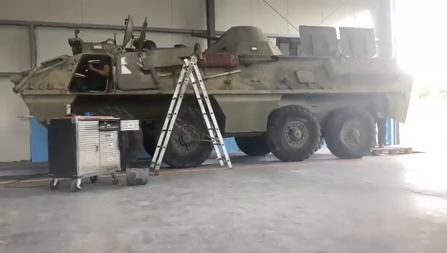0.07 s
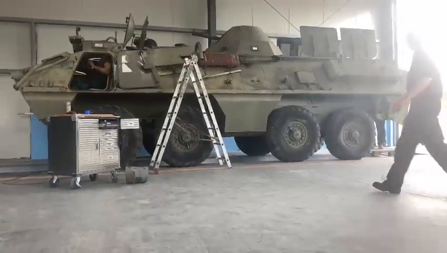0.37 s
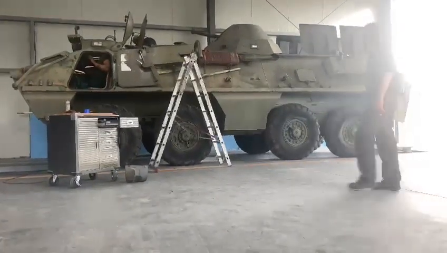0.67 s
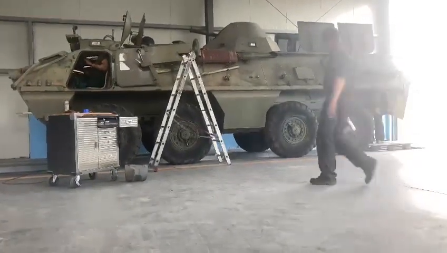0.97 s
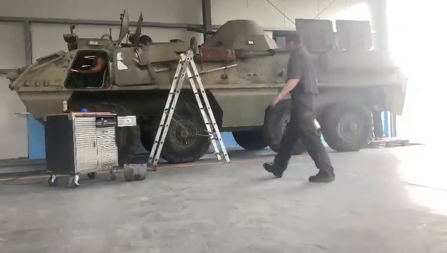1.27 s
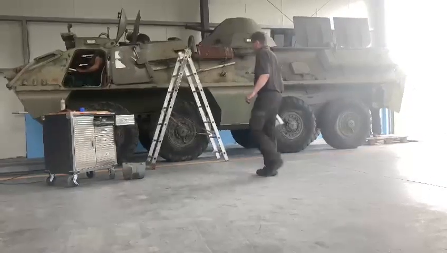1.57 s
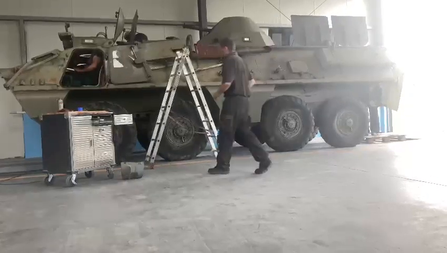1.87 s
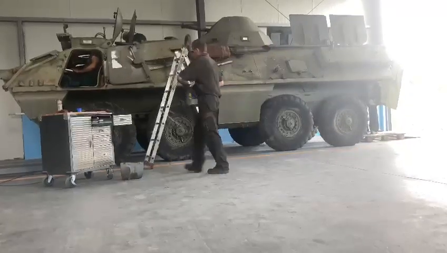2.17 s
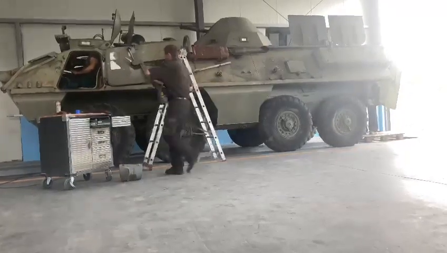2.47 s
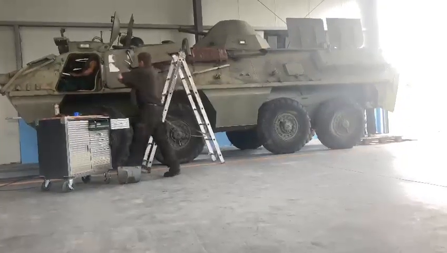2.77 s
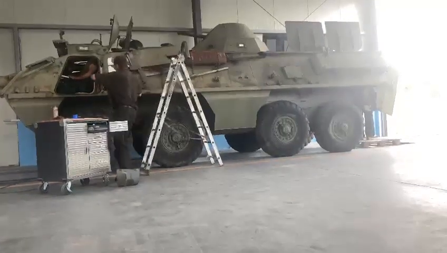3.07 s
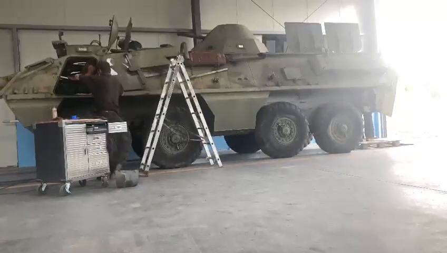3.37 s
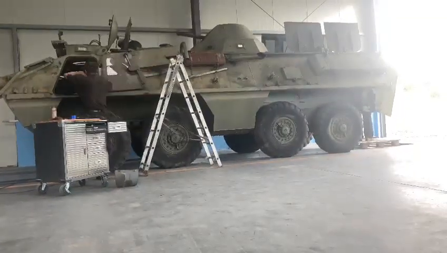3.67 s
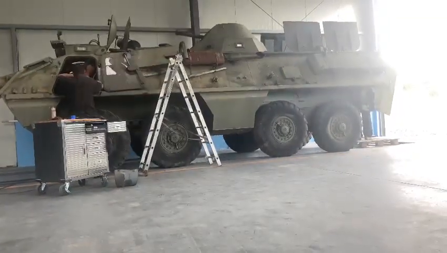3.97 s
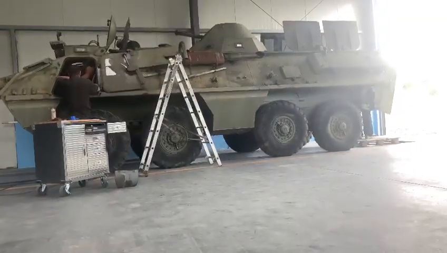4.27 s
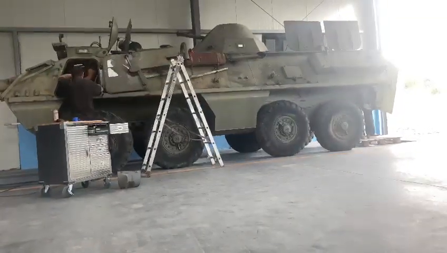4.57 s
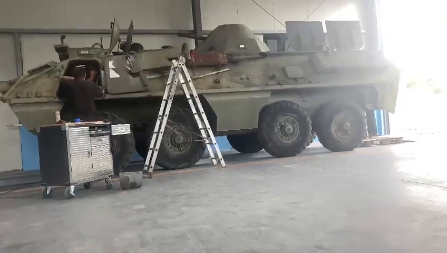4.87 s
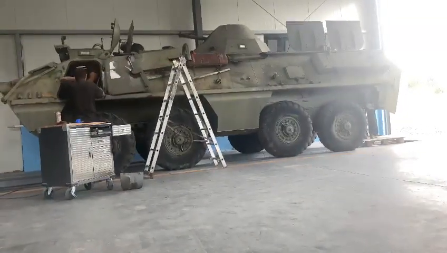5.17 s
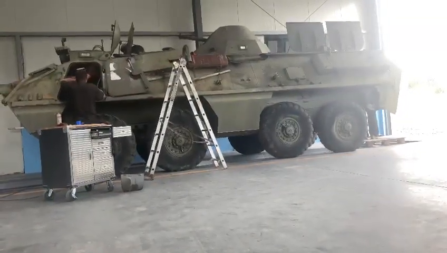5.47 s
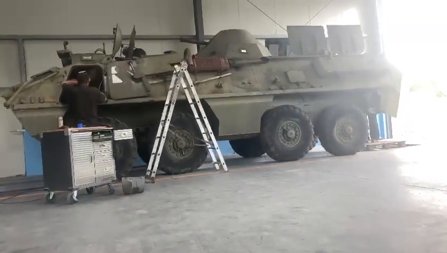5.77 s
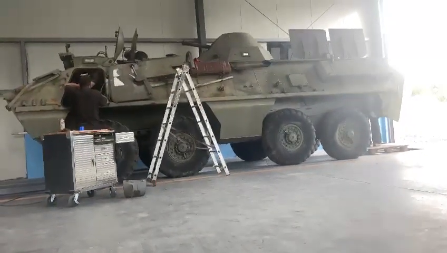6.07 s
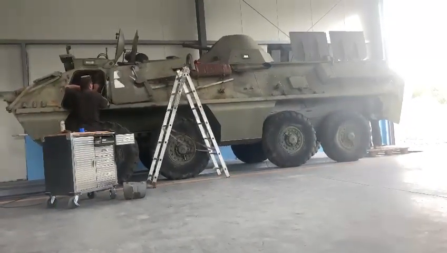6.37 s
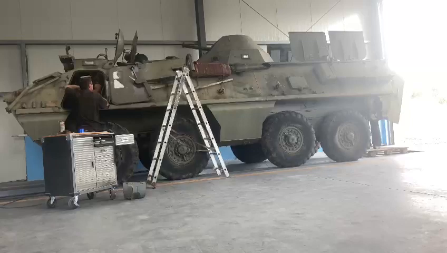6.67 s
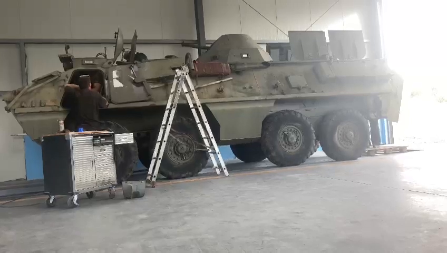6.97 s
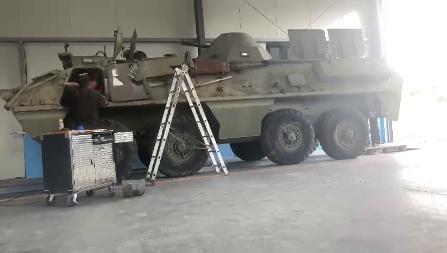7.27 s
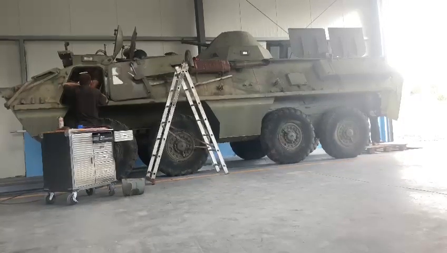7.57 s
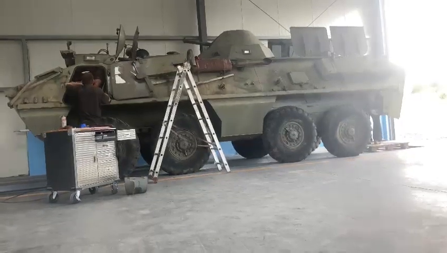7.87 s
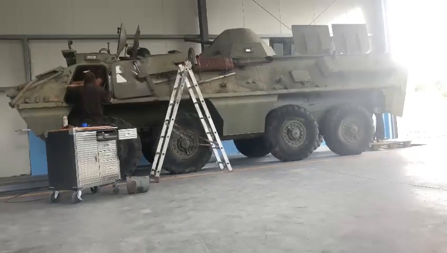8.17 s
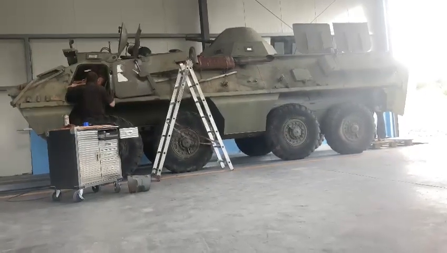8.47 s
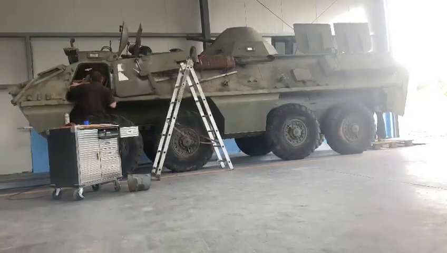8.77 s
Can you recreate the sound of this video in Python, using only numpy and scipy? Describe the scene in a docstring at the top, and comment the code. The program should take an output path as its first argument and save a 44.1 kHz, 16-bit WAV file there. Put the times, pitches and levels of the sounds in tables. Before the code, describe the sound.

A large armoured vehicle engine runs throughout in a big, echoing hangar, heard in stereo from out on the floor. It is revved right at the start and again at about 0.8 seconds, each stab a rough exhaust roar with a low thump and a raspy bark. It then coasts down in deep, booming chugs. More revs come at about 2.6, 3.3 and 4 seconds, climbing higher each time, followed by another high one at 5.3 seconds and a slightly softer last one near 6.9 seconds. A faint whine glides with the engine at the highest speeds. Each roar hangs briefly in the hall. Between revs, fan rush and valve ticking show through the rumble, with a faint metallic ring near idle. From about 7.5 seconds the engine winds down, throbbing more quietly until the end at around 9 seconds.

```python
"""A big, echoing hangar, heard from a stereo pair out on the floor: an eight-cylinder armoured vehicle
is revved seven times. Each stab of throttle opens a rough exhaust roar, made of one puff of gas per
firing. As the engine coasts down, its low orders boom in chugs through the hall's standing waves, and
the cooling fan, valve gear, a metallic ring and a faint accessory whine come through."""
import sys
import numpy as np
from scipy import signal
from scipy.fft import rfft, irfft, next_fast_len
from scipy.io import wavfile
from scipy.ndimage import uniform_filter1d, map_coordinates

SR = 44100
rng = np.random.default_rng(int(sys.argv[2]) if len(sys.argv) > 2 else 0)


def inscribe(sig):
    """Save sig as 16-bit PCM at rate SR to the path in sys.argv[1].

    A 1-D sig is mono; a 2-D sig holds one channel per row.
    Samples are clipped to [-1, 1] before scaling.
    """
    pcm = np.round(np.clip(np.atleast_2d(sig).T, -1, 1) * 32767)
    wavfile.write(sys.argv[1], SR, pcm.astype(np.int16))


N = 393372
REFERENCE_TURNS_PER_S = 20


def from_db(db):
    """Decibels to gain."""
    return np.exp(np.asarray(db) * (float(np.log(10)) / 20))


def rms_one(x):
    """Scale to unit power."""
    return x / np.sqrt(np.mean(x ** 2) + 1e-20)


def steady(x):
    """Even out the slow swell of a stereo layer."""
    return x / np.sqrt(uniform_filter1d(np.mean(x ** 2, axis=0), size=4500) + 1e-9)


def in_time(points):
    """Read a curve at every sample."""
    return np.interp(np.arange(N) / SR, *np.transpose(points))


def at_hz(points, hz):
    """Read a spectrum on a log-frequency axis."""
    f, value = np.transpose(points)
    return np.float32(np.interp(np.log(hz + 1), np.log(f), value))


def drift(rate):
    """Smooth chance with spread 1, changing `rate` times a second."""
    knots, coarse = rng.standard_normal(1024), np.arange(0, N, 50)
    slow = map_coordinates(knots, [coarse / SR * rate], order=2, mode="wrap")
    return np.interp(np.arange(N), coarse, rms_one(slow))


# resonances of silencer and hull: (frequency [Hz], width [Hz], level [dB])
HULL_RESONANCES = [(370, 25.5, 5.5), (425, 113, 6.5), (622, 26, 4.5), (837, 194, 5), (935, 41, 3),
                   (1380, 130, 4), (2130, 300, 1.2), (2980, 240, 2.5)]
# likeness of the echoes at the two microphones: (frequency [Hz], correlation [-])
ECHO_LIKENESS = [(50, 0.97), (125, 1), (250, 0.91), (500, 0.59), (1000, 0.29), (2000, 0.35), (4000, 0.074),
                 (5800, 0), (7000, 0.3), (11000, 0)]
# left microphone over right: (frequency [Hz], level [dB])
MIC_BALANCE = [(60, 14.5), (125, -8), (250, 1), (500, 1), (1000, 2.5), (2000, 0.8), (4000, -.5),
               (10000, -0.5)]

def radiate(x, spectrum, early_s, wet_db, direct_db, hangar_t60_s=1.4, left_lag_s=.00025):
    """Colour a source, ring it through the hull and carry it across the hangar to the pair; rms 1."""
    size = next_fast_len(N + 2 * SR, True)
    hz, t = np.arange(size // 2 + 1, dtype="f") * (SR / size), np.arange(2 * SR) / SR
    # dense early echoes off floor and hull, then the long tail of the hall
    decay = 1000 ** (-t / early_s) + from_db(wet_db) * 1000 ** (-t / hangar_t60_s)
    echoes = rng.standard_normal((2, len(t))) * decay / np.sqrt(np.sum(decay ** 2))
    mid, side = rfft(np.float32(echoes), size)
    alike, sides = np.clip(at_hz(ECHO_LIKENESS, hz), -.99, .99), np.float32([[1], [-1]])
    paths = np.sqrt(1 + alike) * mid + sides * np.sqrt(1 - alike) * side
    # the direct sound reaches the right microphone first
    paths[0] += from_db(direct_db) * np.exp(-2j * np.pi * hz * left_lag_s)
    paths[1] += from_db(direct_db)
    # a large body radiates from many places, so the hall favours no single pitch
    paths /= np.sqrt(uniform_filter1d(np.abs(paths) ** 2, size=50))
    hull_db = sum(db / (1 + (2 * (hz - f) / width) ** 2) for f, width, db in HULL_RESONANCES)
    colour = from_db(at_hz(spectrum, hz) + hull_db + sides * at_hz(MIC_BALANCE, hz) / 2) * hz / (hz + 20)
    running = np.float32(np.concatenate([x[:SR][::-1], x]))  # the hall is already filled with sound
    return rms_one(irfft(rfft(running, size) * paths * colour, size)[:, SR:SR + N])


# hangar modes, negative where the pair stands in an opposite lobe: (frequency [Hz], width [Hz], gain [-])
HANGAR_MODES = [(48.2, 1.5, 0.46), (49.1, 6.6, -1.53), (49.8, 5.4, 1.26), (53.3, 1.2, -0.25),
                (56.0, 1.6, -0.37), (57.9, 1.2, 0.16), (59.7, 1.8, -0.82), (60.6, 1.7, 0.41),
                (63.7, 1.2, 0.84), (64.2, 2.2, -0.71), (68.6, 1.2, 0.69), (71.0, 1.2, 0.23),
                (76.5, 2.1, 0.99), (84.3, 1.8, 0.83), (87.6, 1.6, 0.9), (92.8, 1.5, 1.05),
                (96.7, 3.9, -0.2), (99.9, 2.7, 1.26), (103.1, 1.2, 1.12), (108.2, 1.7, 1.06),
                (110.8, 1.2, 0.25), (114.5, 3.2, 0.59), (116.2, 1.2, 0.89), (119.6, 1.8, 0.39),
                (122.4, 1.6, 1.72), (122.8, 1.8, -1.01), (128.4, 1.2, -0.53)]

def standing_waves(x):
    """Gliding tones ring the hall's modes one after another, so the boom surges and drops out in chugs."""
    size = next_fast_len(N + 2 * SR, True)
    hz = np.arange(0, 500, SR / size)
    response = sum(gain / (1 + 2j * (hz - f) / width) for f, width, gain in HANGAR_MODES)
    return irfft(rfft(x, size)[:len(hz)] * response, size)[:N]


# stabs of throttle: (start [s], held open [s], roar [dB], thump [dB], burble [dB], climb [s],
# top speed [turns/s], linger near the top [s])
THROTTLE_STABS = [(0.04, 0.2, 1.6, 5.5, 3.5, 0.288, 18.48, 0.31),
                  (0.79, 0.3, 0.1, 5.4, 0.5, 0.376, 21.8, 0.34),
                  (2.61, 0.39, -1.1, 2.6, 3, 0.478, 19.2, 0.37),
                  (3.29, 0.26, 1.5, 7.1, -3.5, 0.398, 24.27, 0.5),
                  (4.04, 0.44, 0.1, -8, -2.5, 0.592, 31.89, 0.56),
                  (5.32, 0.3, -2, -22, -6, 0.405, 30.98, 0.574),
                  (6.85, 0.33, -3.9, -7.4, -3.5, 0.415, 28.64, 0.305)]

def crank_speed(start_turns_per_s=13.6, sag_per_s=.23, coast_per_s=.398):
    """Each stab pulls the crank up to a top speed; it sags a little, then coasts down. Turns per s."""
    t = np.arange(N) / SR
    speed = np.full(N, start_turns_per_s)
    for start, *_, climb, top, linger in THROTTLE_STABS:
        since, before = t - start, np.interp(start, t, speed)
        rise = np.sin(np.pi / 2 * np.clip(since / climb, 0, 1)) ** 2
        sag = sag_per_s * np.clip(since - climb, 0, linger)
        coast = coast_per_s * np.maximum(since - climb - linger, 0)
        speed = np.where(since < 0, speed, (before + (top - before) * rise) * np.exp(-sag - coast))
    return speed


def throttle(strengths_db, attack_s, release_s):
    """Gain that swells while the throttle is held open and dies away after each stab."""
    t, power = np.arange(0, N, 50) / SR, 0
    for (start, held, *_), db in zip(THROTTLE_STABS, strengths_db):
        swell = 1 - np.exp(-np.clip(t - start, 0, held) / attack_s)
        fade = np.exp(-np.maximum(t - start - held, 0) / release_s)
        power += (from_db(db) * swell * fade) ** 2
    return np.interp(np.arange(N) / SR, t, np.sqrt(power))


# the coasting engine sinks a little towards the end: (time [s], level [dB])
COASTING_TRIM = [(0, 1), (2.1, 0.5), (4, 0.6), (7, -2), (7.8, -1.7), (8.3, -2.8), (8.92, -1.7)]

def effort(speed, push, coast_db, db_per_octave, open_db):
    """Gain of a layer: a coasting part that grows with crank speed, and a part following the throttle."""
    octaves = np.log2(speed / REFERENCE_TURNS_PER_S)
    coasting = from_db(coast_db + in_time(COASTING_TRIM) + db_per_octave * octaves)
    return np.hypot(coasting, from_db(open_db) * push)


# the eight firings of one cycle: (level [dB])
CYLINDER_LEVELS = [1.5, -6.5, 5, -5.5, -13.5, 2.5, -6, -3.5]

def firings(turns, uneven_db=6, jitter_s=.0006):
    """Four pressure pulses a turn, each cylinder with its own strength."""
    due = np.flatnonzero(np.diff(np.floor(4 * turns)))
    strength, lateness = rng.standard_normal((2000, 2))[:len(due)].T
    when = np.clip(due + (jitter_s * SR * lateness).astype(int), 0, N - 1)
    pulses = np.zeros(N)
    pulses[when] = from_db(np.resize(CYLINDER_LEVELS, len(due)) + uneven_db * strength)
    return pulses


def puffs(pulses, length_s, between):
    """Each firing lets out a short puff of turbulent gas over a steady flow of strength `between`."""
    flow = np.sqrt(pulses)  # gas speed goes with the root of the pressure
    gate = signal.lfilter([1], [1, -np.exp(-1 / (length_s * SR))], flow + 1e-18)
    return (rms_one(gate) + between) * rng.standard_normal(N)


# swell of the metallic ring: (time [s], level [dB])
RING_SWELL = [(0, -31.5), (1.3, -44.5), (2.0, -31.5), (2.6, -37.5), (6.5, -66), (8.92, -35.5)]
# its colour: (frequency [Hz], density [dB])
RING_SPECTRUM = [(400, -35), (640, 11), (900, -33), (1250, -0.5), (1480, 3), (1750, -1.5), (2600, -55)]

def metallic_ring(ticking):
    """The ticking rings in two narrow bands, off in the hall and clearest near idle."""
    gain = from_db(in_time(RING_SWELL) + 2 * drift(9))
    return gain * radiate(ticking, RING_SPECTRUM, early_s=.12, wet_db=-5, direct_db=-9)


# colour of fan, valve gear and accessory: (frequency [Hz], density [dB])
MACHINERY_SPECTRUM = [(200, 3.5), (400, 6.5), (680, 1.5), (850, -10.5), (1100, -0.5), (1470, 6.5),
                      (1900, 2.5), (2500, 3.5), (3020, 3.5), (3500, -1.5), (4700, -3.5), (6200, -14.5),
                      (11500, -33)]

def fan_and_valves(ticking, speed, push):
    """The fan's rush and the valve ticks grow with the revs and arrive mostly by early echoes."""
    gain = effort(speed, push, coast_db=-29, db_per_octave=9, open_db=-24.5)
    return gain * steady(radiate(ticking, MACHINERY_SPECTRUM, early_s=.24, wet_db=-30, direct_db=-6.5))


def accessory_whine(turns, speed, order=41.2):
    """A belt-driven accessory sings at high revs, gliding with the crank and swelling unevenly."""
    tone = np.sin(2 * np.pi * order * turns + .55 * drift(45))
    swell = (speed / speed.max()) ** 5 * from_db(1.5 * drift(6))
    whine = radiate(tone * swell, MACHINERY_SPECTRUM, early_s=.15, wet_db=-14, direct_db=-2)
    return from_db(-42.3) * whine


def pipe_hiss(pulses, speed, bite):
    """Hot gas tears at the pipe mouth; this hiss reaches the microphones straight, without echo."""
    gas = puffs(pulses, length_s=.0023, between=3)
    hiss = signal.sosfilt(signal.butter(2, 8000, "high", fs=SR, output="sos"), gas)
    return effort(speed, bite, coast_db=-46.3, db_per_octave=8, open_db=-35.4) * rms_one(hiss)


# colour of the exhaust pipe: (frequency [Hz], level [dB])
PIPE_SPECTRUM = [(25, -40), (45, -19), (70, -9), (92, -3.5), (125, -3), (165, -2.5), (220, 0), (300, -6.5),
                 (380, -7.5), (550, -13.5), (900, -19.5), (2000, -75)]

def exhaust_burble(pulses, speed, load):
    """Each firing is a pressure pulse with a gulp of turbulence behind it; distant, mostly echo."""
    blows = rms_one(pulses) + .47 * rms_one(puffs(pulses, length_s=.0056, between=.068))
    gain = effort(speed, load, coast_db=-27, db_per_octave=7, open_db=-20)
    return gain * steady(radiate(blows, PIPE_SPECTRUM, early_s=.59, wet_db=-5, direct_db=-11))


# crank orders 3, 5 and 7 under load, ahead of the pipe: (level [dB])
LOPE_LEVELS = [-20, -24, -24]

def exhaust_lope(turns, speed, load, flutter_db=3):
    """Under load at low revs the two cylinder banks blow unevenly, which fills in the odd orders."""
    tones = 0
    for order, db in zip((3, 5, 7), LOPE_LEVELS):
        gain = from_db(db + at_hz(PIPE_SPECTRUM, order * speed) + flutter_db * drift(6.6))
        # echoes make the phase wander, partly on its own at each microphone
        wander = drift(14) + .5 * np.array([drift(6.3), drift(22)])
        tones += gain * np.sqrt(2) * np.sin(2 * np.pi * (order * turns + rng.random()) + wander)
    unevenness = np.minimum(1, REFERENCE_TURNS_PER_S / speed) ** 2
    return load * unevenness * tones


# low exhaust tones: (order [x crank speed], coasting level [dB], throttle level [dB])
BOOM_TONES = [(2, -13, -37), (4, -20.3, -12.4), (6, -28.5, -14.3)]
# the boom eases off in the last run-down: (time [s], level [dB])
BOOM_TRIM = [(0, 0), (1.5, -1), (2.2, 1), (4.3, 0), (5, -1), (5.8, -0.3), (7.8, 0), (8.5, -3.5)]

def exhaust_boom(turns, thump, wobble_turns=.006, throb_db=1.4):
    """Orders 2, 4 (the firing rate) and 6 of a slightly unsteady crank: near-clean, throbbing tones."""
    angle = 2 * np.pi * (turns + wobble_turns * drift(24))
    tones = 0
    for order, coast_db, open_db in BOOM_TONES:
        gain = np.hypot(from_db(coast_db), from_db(open_db) * thump)
        tones += gain * from_db(throb_db * drift(13)) * np.sin(order * angle)
    return np.sqrt(2) * from_db(in_time(BOOM_TRIM)) * tones


# colour of the bark: (frequency [Hz], density [dB])
BARK_SPECTRUM = [(500, -29), (1000, 1.5), (1500, 3), (2300, -7), (3200, -9.5), (6000, -41)]

def exhaust_bark(pulses, snap):
    """Under open throttle the strong firings crack in the pipe: close, uneven upper-midrange bursts."""
    cracks = rms_one(puffs(pulses ** 1.25, length_s=.0018, between=.15))
    bark = steady(radiate(cracks, BARK_SPECTRUM, early_s=.1, wet_db=-11, direct_db=3.5))
    return from_db(-24) * snap * bark


# colour of the roar: (frequency [Hz], density [dB])
ROAR_SPECTRUM = [(150, 4.5), (280, -12), (380, -5.5), (520, -0.5), (700, 1), (950, -1), (1150, -3.5),
                 (1500, -11.5), (2100, -11.5), (3000, -25), (5000, -36), (7000, -20), (12000, -69)]

def exhaust_roar(pulses, speed, push):
    """Puffs of gas merge into a rough roar; at middle distance, about half direct and half echo."""
    gas = puffs(pulses, length_s=.0032, between=.45)
    gain = effort(speed, push, coast_db=-27.5, db_per_octave=6, open_db=-15)
    return gain * steady(radiate(gas, ROAR_SPECTRUM, early_s=.34, wet_db=-12.5, direct_db=-1))


def scene():
    """The vehicle at the microphones: the crank times every layer, speed and throttle set the levels."""
    _, _, roar_db, thump_db, burble_db, *_ = np.transpose(THROTTLE_STABS)
    speed = crank_speed()
    turns = np.cumsum(speed) / SR
    pulses = firings(turns)
    # roar and thump hang in the hall after each stab; the hiss's bite stops almost at once
    push = throttle(roar_db, attack_s=.135, release_s=.25)
    thump = throttle(thump_db, attack_s=.19, release_s=.172)
    load = throttle(burble_db, attack_s=.15, release_s=.34)
    snap = throttle(roar_db, attack_s=.09, release_s=.17)
    bite = throttle(roar_db, attack_s=.11, release_s=.09)
    low = standing_waves(exhaust_boom(turns, thump)) + exhaust_lope(turns, speed, load)
    low *= from_db([[-.6], [.6]])  # a little stronger on the right
    body = exhaust_burble(pulses, speed, load) + exhaust_roar(pulses, speed, push)
    edge = exhaust_bark(pulses, snap) + pipe_hiss(pulses, speed, bite)
    ticking = puffs(pulses, length_s=.0013, between=1.4)  # valve ticks over steady fan noise
    machinery = fan_and_valves(ticking, speed, push) + accessory_whine(turns, speed)
    return metallic_ring(ticking) + machinery + low + body + edge


def record(dry, ceiling=.95, cutoff_hz=11600):
    """The recorder rounds the highest peaks and cuts the top steeply."""
    rounded = dry / (1 + (dry / ceiling) ** 8) ** (1 / 8)
    return signal.sosfilt(signal.ellip(10, .1, 90, cutoff_hz, fs=SR, output="sos"), rounded)


dry = scene()
out = record(dry)
inscribe(out)
```